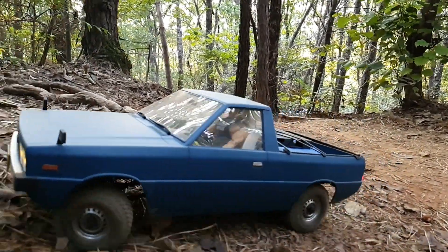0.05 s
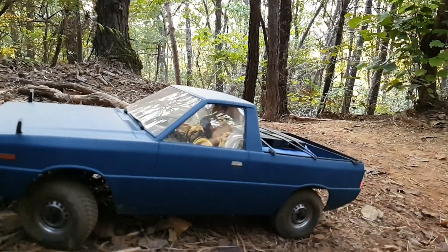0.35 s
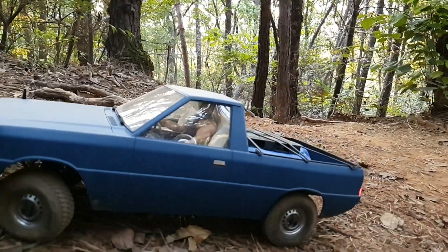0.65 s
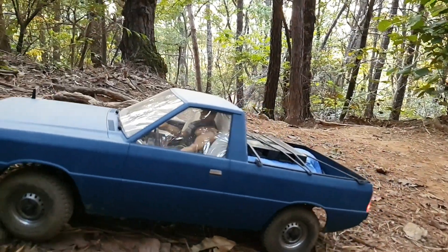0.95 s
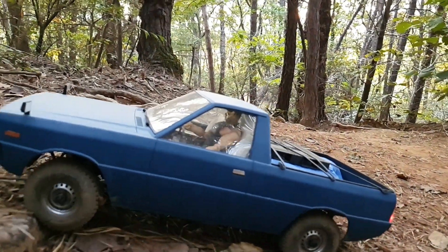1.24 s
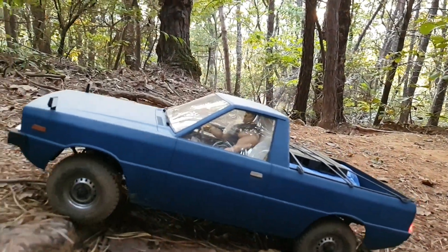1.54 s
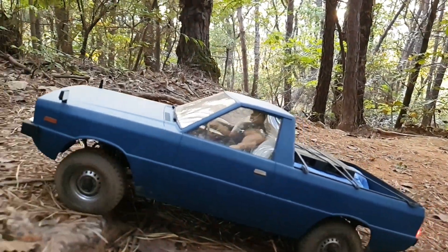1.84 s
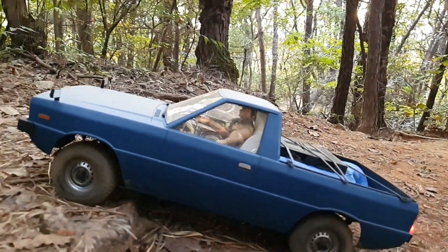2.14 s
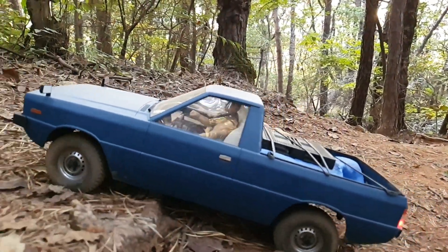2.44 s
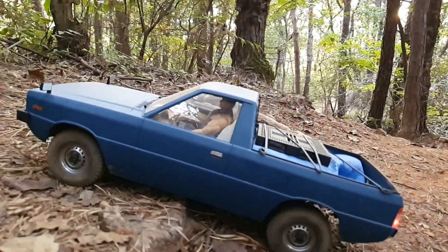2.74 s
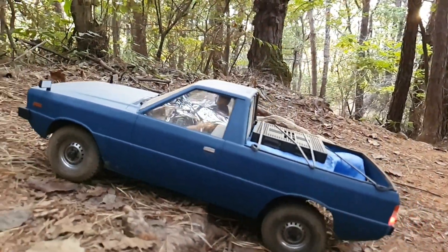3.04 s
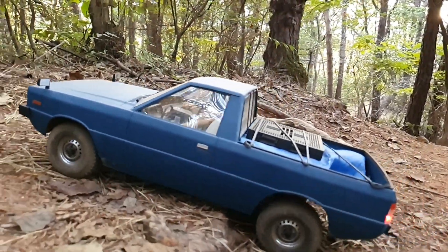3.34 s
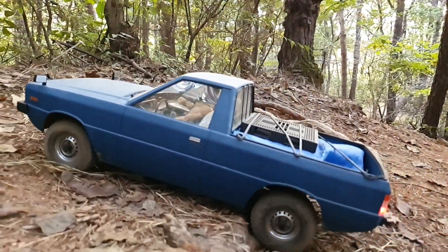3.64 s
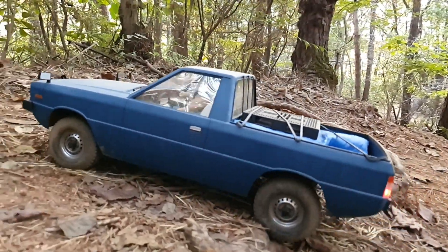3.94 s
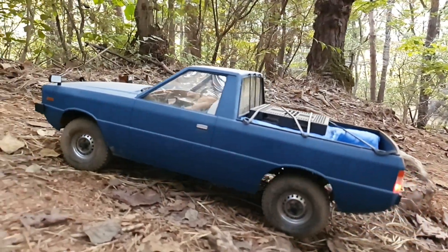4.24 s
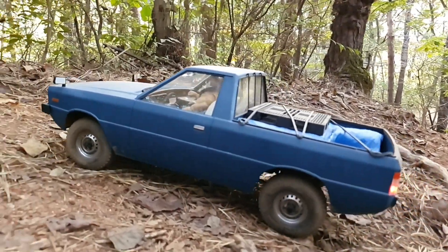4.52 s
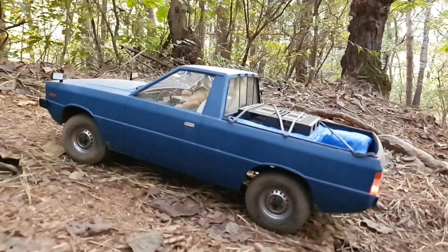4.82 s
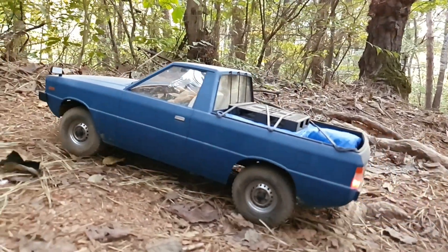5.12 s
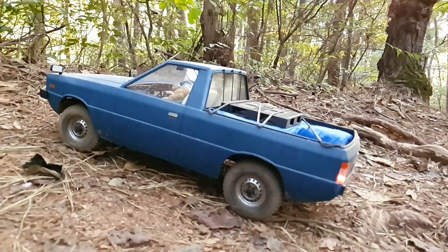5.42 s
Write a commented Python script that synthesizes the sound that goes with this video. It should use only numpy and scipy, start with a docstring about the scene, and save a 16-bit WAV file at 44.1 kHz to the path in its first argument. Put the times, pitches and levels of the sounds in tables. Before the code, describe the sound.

Close by, a toy truck's electric gear whine slows and recovers twice as its tyres crackle over dry leaves and twigs.

```python
"""On a forest slope, a small electric radio-controlled truck crawls uphill close by, over a low rumble.
Its gears whine at the tooth rate, sag in pitch twice under load and throb in the hollow body shell.
Tooth impacts ring the gearbox housing and vibration makes loose fittings tick. The tyres crush dry
leaves and snap twigs, each fracture a brief impulse, while the speed controller's switched current
makes the motor whistle faintly."""
import sys
import numpy as np
from scipy.fft import rfft, irfft, next_fast_len
from scipy.io import wavfile
from scipy.ndimage import uniform_filter1d, map_coordinates

SR = 44100
rng = np.random.default_rng(int(sys.argv[2]) if len(sys.argv) > 2 else 0)


def to_wav(s):
    """Save 16-bit WAV."""
    ch = np.atleast_2d(s).T  # columns
    pcm = np.round(np.clip(ch, -1, 1) * 32767)  # PCM
    wavfile.write(sys.argv[1], SR, pcm.astype(np.int16))


N = 250047
TIME = np.arange(N) / SR
TOP_HZ = 11400


def amp(db):
    """Amplitude ratio of a level in decibels."""
    return 10 ** (np.asarray(db) / 20)


def unit(x):
    """Normalisation to rms 1."""
    return x / np.sqrt(np.mean(x ** 2) + 1e-20)


def along(points, hz):
    """Interpolation on a logarithmic frequency axis."""
    f, v = np.transpose(points)
    return np.interp(np.log(hz + 1), np.log(f + 1), v)


def curves(rows):
    """Linear interpolation in time, one curve per value column."""
    times, *columns = np.transpose(rows)
    return [np.interp(TIME, times, column) for column in columns]


def swells(rows):
    """Superposition of Gaussian changes of level, in dB."""
    t = np.arange(0, N / SR, 1 / 1000)
    gain_db = sum(db * np.exp(-2 * ((t - centre) / width) ** 2) for centre, width, db in rows)
    return np.interp(TIME, t, gain_db)


def noise():
    """Two uncorrelated white noises."""
    return rng.standard_normal((2, N))


def wobble(rate):
    """Smooth random modulation, with rate knots per second."""
    return map_coordinates(rng.standard_normal(int(N * rate / SR) + 4), [TIME * rate])


def filtered(x, response):
    """Linear filtering: the spectrum times a complex frequency response."""
    size = next_fast_len(N + SR // 2)
    return irfft(rfft(x, size) * response(np.fft.rfftfreq(size, 1 / SR)), size)[..., :N]


def resonance(f, centre, width):
    """Frequency response of a damped oscillator."""
    return 1j * f * width / (centre ** 2 - f ** 2 + 1j * f * width)


# likeness of left and right: (frequency [Hz], coherence [0-1])
COHERENCE = [(30, .99), (130, .97), (300, .92), (600, .85), (1000, .6), (2500, .4), (8000, .25)]
def stereo(pair):
    """Partial coherence: two noises mix into a pair of rms 1, most alike in the bass."""
    angle = lambda hz: np.arccos(np.clip(along(COHERENCE, hz), -1, 1)) / 2
    mid, side = filtered(pair, lambda hz: np.array([np.cos(angle(hz)), np.sin(angle(hz))]))
    return unit(np.array([mid + side, mid - side]))


def coloured(pair, spectrum):
    """Spectral shaping into a stereo sound of rms 1."""
    return stereo(filtered(pair, lambda hz: amp(along(spectrum, hz))))


def levelled(pair):
    """Division by the running rms keeps loudness the same, whichever resonance is excited."""
    power = uniform_filter1d(np.mean(pair ** 2, axis=0), size=SR // 16)
    return stereo(pair / np.sqrt(np.abs(power)))


# outdoor background: (frequency [Hz], relative level [dB])
RUMBLE_SPECTRUM = [(10, -4.5), (36, -6.5), (48, 0.5), (60, -6.5), (80, -20), (125, -8), (250, -28),
                   (600, -22.5), (1500, -33.5), (4000, -47.5)]
def forest_rumble():
    """Stationary noise with its energy at low frequencies."""
    return amp(-61.5) * coloured(noise(), RUMBLE_SPECTRUM)


# motor speed, sagging twice under load: (time [s], tooth rate [Hz])
TOOTH_RATE = [(0, 451.8), (.08, 440.2), (.14, 498.7), (.36, 500), (.43, 519.6), (.485, 498), (.51, 438.2),
              (.72, 398), (.84, 357), (1, 353.8), (1.07, 272.6), (1.12, 200.7), (1.17, 211), (1.23, 174.4),
              (1.38, 160.2), (1.41, 199.7), (1.51, 187.8), (1.62, 239), (1.68, 277.5), (1.81, 285.4),
              (1.9, 357.2), (2.24, 445), (2.62, 416.5), (2.68, 361), (2.92, 365.9), (3.05, 305.5),
              (3.28, 305), (3.58, 355.8), (3.78, 313.4), (3.82, 286.6), (3.98, 257.3), (4.01, 205.2),
              (4.08, 233), (4.12, 199), (4.17, 243.8), (4.22, 210.2), (4.33, 236.4), (4.37, 267.4),
              (4.44, 278.5), (4.54, 359.4), (4.65, 361), (4.77, 457.5), (5.13, 454.3), (5.22, 411.9),
              (5.36, 444.4), (5.67, 406.3)]
def gear_rotation(hunt=0.016, teeth_per_turn=92, first_tight_tooth=35.7):
    """Phase is the integral of tooth rate; an eccentric gear meshes tightly once a turn."""
    tooth_hz, = curves(TOOTH_RATE)
    teeth = np.cumsum(tooth_hz * (1 + hunt * wobble(25))) / SR  # the motor hunts about its speed
    tight = np.cos(2 * np.pi * (teeth - first_tight_tooth) / teeth_per_turn)
    return tooth_hz, 2 * np.pi * teeth, tight


def drive_level(law, speed, tight):
    """A power law of speed, in dB, modulated by the eccentric gear and falling with distance."""
    usual_db, doubling_db, swing_db, recede_db_per_s = law
    return usual_db + doubling_db * np.log2(speed) + swing_db * tight - recede_db_per_s * TIME


# response of the hollow shell to the mesh: (tooth rate [Hz], level [dB])
SHELL_RESPONSE = [(160, -43.5), (190, -50), (245, -46.5), (283, -45), (303, -52), (350, -54.6), (440, -55),
                  (500, -48.5)]
# surges as the teeth bind: (time [s], width [s], gain [dB])
TOOTH_BINDS = [(.06, 0.13, 9), (.28, 0.093, 4), (.52, 0.025, 7.5), (.63, 0.2, 6), (1.06, 0.046, 5.5),
               (1.14, .04, 5), (1.685, 0.026, 7.5), (1.742, 0.016, 3), (1.8, 0.032, 10), (2.15, 0.17, 7),
               (2.88, 0.056, 3.5), (3.25, 0.021, 8.5), (3.825, 0.05, 5.5), (3.875, 0.042, 1.5),
               (3.975, 0.021, 3.5), (4.08, 0.017, 1), (4.41, 0.072, 5), (4.6, 0.16, 6.5), (4.98, 0.06, 8.5),
               (5.6, 0.4, 5)]
# mostly dips, as the teeth slip free: (time [s], width [s], gain [dB])
TOOTH_SLIPS = [(1.105, 0.0085, 3), (1.43, .02, -7), (1.637, .012, -23), (1.72, 0.014, -3),
               (1.762, 0.0068, -10), (3.91, 0.012, -10)]
def mesh_amplitude(tooth_hz, tight, swing_db=0.43, recede_db_per_s=1.0):
    """Forced vibration: the mesh tone booms where the tooth rate meets a resonance of the shell."""
    load_db = swells(TOOTH_BINDS) + swells(TOOTH_SLIPS) + swing_db * tight
    return amp(along(SHELL_RESPONSE, tooth_hz) + load_db - recede_db_per_s * TIME)


def rough_tone(phase, blur, flutter_db):
    """Uneven teeth modulate one mesh harmonic in phase and amplitude."""
    return unit(amp(flutter_db * wobble(70)) * np.sin(phase + blur * wobble(130)))


# play between the teeth: (time [s], looseness [0 firm to 1 rattling])
TOOTH_PLAY = [(.6, 0), (.9, .5), (2.22, .2), (2.42, 1), (2.9, .5), (3.4, .8), (3.85, .1), (4.6, .1),
              (4.8, .45)]
# radiation of the overtones by the chassis: (frequency [Hz], gain [dB])
CHASSIS_RESPONSE = [(520, -9), (690, -14), (830, -12), (900, -17), (1030, -6), (1250, -21), (1480, -6),
                    (1700, -26)]
def gear_whine(phase, speed, mesh_gain, loose, flutter_db=2.0, rock_rad=0.12, backlash=0.66):
    """Periodic tooth contact gives harmonics; backlash smears them and an off-centre pinion flutters."""
    pressure = mesh_gain * speed / amp(-50)
    slack = np.maximum(.3 + .55 / (1 + pressure ** 3), loose)
    pinion = phase / 12 + 1.2 * wobble(20)  # 12 teeth
    phase = phase + backlash * slack * (wobble(34) + wobble(110)) + rock_rad * np.sin(pinion)
    mesh_gain = mesh_gain * amp(flutter_db * np.cos(pinion))
    # now and then the teeth lose contact for an instant
    contact = 1 - slack / (1 + np.exp(4 * (.9 - loose / 2 - wobble(75))))
    tone = mesh_gain * unit(contact) * rough_tone(phase, blur=.17, flutter_db=1.1)
    second = rough_tone(2 * phase, blur=.45 + .6 * loose, flutter_db=4)
    third = .5 * speed * rough_tone(3 * phase, blur=.4 + loose, flutter_db=4)
    overtones = mesh_gain * (second + third) * np.minimum(speed, 1) * (1 - loose / 2)
    radiated = filtered(overtones, lambda hz: amp(along(CHASSIS_RESPONSE, hz)))
    return (tone + radiated) * amp([[.9], [-.9]])


# gearbox housing: (frequency [Hz], bandwidth [Hz], gain [dB])
HOUSING_MODES = [(533.5, 46, 2), (731, 58, 2), (868, 64, 1), (1011, 100, 0), (1203, 51, 3),
                 (1355, 28, -4.5), (1480, 90, -10.5)]
# rattle: (level at usual speed [dB], rise per speed doubling [dB], swing [dB], fade [dB/s])
RATTLE_LAW = (-57, 10, 2.5, 0.25)
# gearbox noise, louder late in the climb: (time [s], rattle gain [dB], grinding gain [dB])
GEARBOX_GAINS = [(0, 1, -17), (1.3, -3, -2.5), (1.8, 1.5, -7), (3, 0.5, -26), (3.8, 2, -7), (4.2, -1, 3.5),
                 (4.6, 2, -3), (4.85, -0.5, 6), (5.21, 1.5, -2), (5.55, 4, -5)]
def gear_rattle(phase, speed, tight, loose, scrape, burst_db, grind_hz=901, grind_width_hz=194):
    """Impacts excite the housing's modes and friction grinds the flanks, more tonally in a firm mesh."""
    def harmonic(k):
        return np.array([rough_tone(k * phase, .75 + .45 * loose, flutter_db=2.5) for side in range(2)])

    def housing(f):
        modes = sum((-1) ** k * amp(db) * resonance(f, hz, width)
                    for k, (hz, width, db) in enumerate(HOUSING_MODES))
        return modes / (1 + (f / 1900) ** 6)

    rattle_db, grind_db = drive_level(RATTLE_LAW, speed, tight) + np.array(curves(GEARBOX_GAINS))
    overtones = amp(-15 - 5 * loose) * speed ** 2 * (harmonic(2) + amp(-3) * harmonic(3))
    ring = filtered(noise() * scrape + overtones, housing)
    friction = noise() * scrape + amp(-15) * harmonic(2)
    grind = filtered(friction, lambda f: resonance(f, grind_hz, grind_width_hz) ** 2)
    return amp(rattle_db) * levelled(ring) + amp(grind_db + burst_db) * levelled(grind)


# rasp of the tooth flanks: (frequency [Hz], relative level [dB])
RASP_SPECTRUM = [(900, -9.5), (1480, 7.5), (1950, 4.5), (2200, -2.5), (2950, 0.5), (3500, -6), (3950, -3),
                 (6000, -22)]
# rasp: (level at usual speed [dB], rise per speed doubling [dB], swing [dB], fade [dB/s])
FLANK_LAW = (-68, 14, 2.13, 2.02)
def gear_rasp(phase, speed, tight, scrape, load_db):
    """An impulse train, one strike per tooth and made uneven by grit, adds to friction noise."""
    impulses = np.diff(phase // (2 * np.pi), prepend=0)
    strikes = impulses * np.tanh(noise()) * amp(3.5 * np.clip(rng.standard_normal(N), -2, 2))
    excitation = (unit(strikes) + unit(noise() * scrape)) * amp(1.3 * wobble(45))
    return amp(drive_level(FLANK_LAW, speed, tight) + load_db) * coloured(excitation, RASP_SPECTRUM)


# loose plastic fittings: (frequency [Hz], gain [dB])
FITTING_MODES = [(1700, 0.5), (2370, 4.5), (2870, 2), (3450, -3.5)]
def fitting_ticks(shake_db, taps_per_s=70, width_hz=65, offset_db=-6.5):
    """Modal ringing: the drive shakes the fittings, and each tap excites their modes in a new mix."""
    taps = (rng.random(N) < taps_per_s / SR) * amp(8 * rng.random(N))
    ring = sum(filtered(taps * np.tanh(noise()), lambda f: amp(db) * resonance(f, hz, width_hz))
               for hz, db in FITTING_MODES)
    return amp(shake_db + offset_db) * stereo(ring)


# drone of the plastic body: (frequency [Hz], relative level [dB])
DRONE_SPECTRUM = [(60, -44), (100, -10), (130, -2), (165, 1), (210, -6), (285, 3.5), (325, -5), (400, -6),
                  (480, -3.5), (620, -16), (900, -43.5)]
def shell_drone(speed, recede_db_per_s=1.03):
    """Structure-borne sound: the chassis shakes the body, whose drone fades with distance."""
    level_db = -52.5 + 4.6 * (speed - 1) - recede_db_per_s * TIME
    return amp(level_db) * coloured(noise(), DRONE_SPECTRUM)


# leaves: (level at usual speed [dB], rise per speed doubling [dB], swing [dB], fade [dB/s])
LEAF_LAW = (-70, 9.5, -0.15, 0.5)
# a tyre rolls through a heap of leaves: (time [s], width [s], gain [dB])
LEAF_HEAPS = [(.12, 0.047, 4), (.65, 0.029, 8), (.8, 0.09, 4), (1.14, 0.09, 8.5), (1.72, 0.085, 5),
              (2.22, 0.06, 2), (3.33, 0.086, 10.5), (3.62, 0.18, 5), (4.78, 0.19, 5.5), (5.11, 0.12, 6),
              (5.34, 0.033, 7.5), (5.405, 0.023, 5), (5.58, 0.15, 4.5)]
def leaf_crushing(speed, tight):
    """Rolling noise grows with speed and in heaps; gives the leaf level and the heaps' part, in dB."""
    heap_db = swells(LEAF_HEAPS)
    return drive_level(LEAF_LAW, speed, tight) + heap_db, heap_db


# crushed dry leaves: (frequency [Hz], relative level [dB])
LEAF_SPECTRUM = [(700, -15.5), (1600, 6), (2800, -3), (4200, -4.5), (6000, 1), (8500, -1.5), (10500, -4),
                 (12000, -47)]
def leaf_rustle(leaf_db, grains_per_s=900, hiss=0.76):
    """Shot noise: countless tiny fractures, in clumps as the tread blocks land."""
    breaks = rng.random(N) < grains_per_s / SR
    sizes = amp(4 * np.minimum(rng.exponential(size=N), 2))
    grains = unit(np.tanh(noise()) * breaks * sizes)
    clumps = amp(2.2 * wobble(45))
    rustle = coloured((grains + hiss * noise()) * clumps, LEAF_SPECTRUM)
    return amp(leaf_db) * rustle * amp([[.7], [-.7]])


def leaf_crackle(leaf_db, per_s=150, offset_db=-15.0, scatter_db=7, pitch_hz=5000, spread=0.96, cycles=16):
    """Damped free vibration: stiff leaves and needles give way singly, each at its own pitch."""
    out, t = np.zeros((2, N + SR)), np.arange(SR // 60) / SR
    for when, size, pitch, pan, lead in rng.random((round(per_s * N / SR), 5)):
        hz = min(pitch_hz * np.exp(spread * (2 * pitch - 1)), TOP_HZ)
        start_phase = 2 * np.pi * np.array([[0], [lead]]) / 3
        tick = np.sin(2 * np.pi * hz * t + start_phase) * amp(-60 * t * hz / cycles)
        strength = amp(scatter_db * min(-np.log(1 - size), 2))
        out[:, int(when * N):][:, :len(t)] += strength * tick * np.sqrt([[pan], [1 - pan]])
    return amp(leaf_db + offset_db) * unit(out[:, :N])


# the controller's three switching tones: (frequency [Hz])
SWITCHING_HZ = [4002, 8004, 9001]
# their strengths: (time [s], lowest tone [dB], middle tone [dB], highest tone [dB])
SWITCHING_LEVELS = [(.1, -77, -77, -83), (.6, -89, -87, -78.5), (.88, -86, -78, -82),
                    (1.22, -89.5, -85.5, -87), (1.5, -98, -78.5, -87), (1.8, -94, -87, -85.5),
                    (2.25, -86, -87, -86), (2.7, -100, -81.5, -87), (3.17, -93, -79, -88),
                    (3.9, -100, -87, -90), (4.4, -92, -84.5, -82), (4.8, -88, -96, -93)]
def controller_whistle():
    """Magnetic forces of switched current vibrate the windings at set pitches that come and go."""
    tone = lambda hz: unit(amp(2.2 * wobble(14)) * np.sin(2 * np.pi * hz * TIME + .9 * wobble(42)))
    partials = list(zip(SWITCHING_HZ, curves(SWITCHING_LEVELS)))
    return np.array([sum(amp(db) * tone(hz) for hz, db in partials) for side in range(2)])


# breaking leaves and twigs: (time [s], peak level [dB], centre frequency [Hz])
FRACTURES = [(0.333, -42, 7460), (0.613, -40.5, 8300), (.634, -45, 7700), (0.654, -46.5, 4000),
             (0.8122, -40, 5460), (0.8132, -46.5, 2881), (1.93, -50, 6200), (2.0218, -43.5, 6780),
             (2.0347, -49, 8230), (2.2738, -50.5, 3180), (2.4768, -49.5, 2600), (2.545, -52, 2300),
             (2.87, -47.5, 2699), (2.9062, -45, 7750), (2.922, -45, 8700), (3.278, -51, 2133),
             (3.3871, -40.5, 2290), (3.39, -42.5, 6808), (4.045, -54.5, 5750), (4.7525, -45, 9500),
             (4.789, -43, 5890), (4.799, -41.5, 8600), (5.082, -46.5, 6903), (5.1291, -45.5, 7337),
             (5.171, -43.5, 7000), (5.304, -47.5, 7295), (5.5399, -44.5, 9530), (5.6127, -47, 7765)]
def twig_snaps(rise_s=0.0033, crack_t60=0.015, crumble_t60=0.42, crumble_db=-20, breadth=1.08):
    """Brittle fracture: each snap rises quickly, cracks in a broad band, then crumbles."""
    out = np.zeros((2, N + SR))
    t = np.arange(SR // 10) / SR - 1 / 50  # zero at the break
    hz = np.fft.rfftfreq(len(t), 1 / SR)
    rise = amp(60 * np.minimum(t, 0) / rise_s)
    fall = amp(-60 * abs(t) / crack_t60) + amp(crumble_db - 60 * abs(t) / crumble_t60)
    for when, db, pitch_hz in FRACTURES:
        fibres = rng.standard_normal((2, len(t))) * amp(3 * rng.standard_normal(len(t)))
        band = resonance(hz, pitch_hz, breadth * pitch_hz) ** 2 * (hz < TOP_HZ)
        crack = irfft(rfft(fibres * np.where(t < 0, rise, fall)) * band, len(t))
        out[:, round((when + t[0]) * SR):][:, :len(t)] += amp(db) * crack / np.abs(crack).max()
    return out[:, :N] * amp([[1.4], [-1.4]])


# the gears rub the housing: (time [s], width [s], gain [dB])
HOUSING_RUBS = [(2.22, 0.039, 9), (4.87, 0.01, 4), (4.92, 0.015, 2.5), (4.957, 0.015, 3),
                (5.07, 0.032, 4.5), (5.135, 0.044, 8.5), (5.355, 0.022, 11), (5.41, 0.026, 14)]
def grinding_bursts():
    """Intermittent friction against the housing raises the gear noise; the gain in dB."""
    return swells(HOUSING_RUBS)


# lead of the left channel over the right: (frequency [Hz], phase [rad])
PHASE_LEAD = [(0, 0), (520, 1), (1000, 1.55), (2300, 5.5), (11400, 27)]
def from_the_left(pair):
    """Localisation by phase difference: the sound reaches the left side first."""
    half_lead = lambda hz: .5 * np.interp(hz, *np.transpose(PHASE_LEAD))
    return filtered(pair, lambda hz: np.exp(1j * half_lead(hz) * np.array([[1], [-1]])))


def scene(usual_hz=400):
    """Superposition of truck and forest; one motor speed governs the gear, body and leaf noise."""
    tooth_hz, phase, tight = gear_rotation()
    speed = tooth_hz / usual_hz
    loose, = curves(TOOTH_PLAY)
    leaf_db, heap_db = leaf_crushing(speed, tight)
    burst_db = grinding_bursts()
    truck = gear_whine(phase, speed, mesh_amplitude(tooth_hz, tight), loose)
    scrape = (1 + .55 * np.cos(phase)) * amp(1.9 * wobble(90))  # friction pulses once per tooth
    truck += gear_rattle(phase, speed, tight, loose, scrape, burst_db)
    truck += gear_rasp(phase, speed, tight, scrape, load_db=0.98 * heap_db + 0.37 * burst_db)
    truck += fitting_ticks(leaf_db + burst_db / 2) + shell_drone(speed)
    truck += leaf_rustle(leaf_db) + leaf_crackle(leaf_db)
    return from_the_left(truck) + controller_whistle() + twig_snaps() + forest_rumble()


def record(dry):
    """A steep low-pass filter limits the bandwidth."""
    return filtered(dry, lambda hz: 1 / np.sqrt(1 + (hz / TOP_HZ) ** 120))


dry = scene()
out = record(dry)
to_wav(out)
```